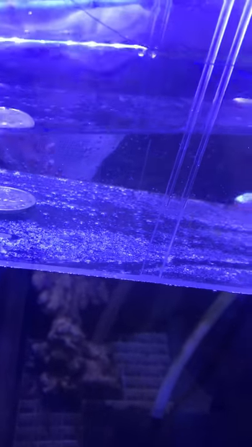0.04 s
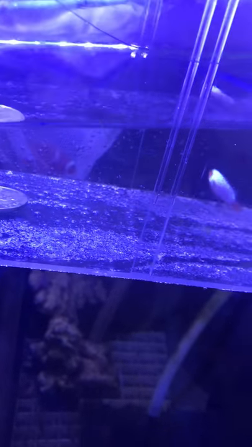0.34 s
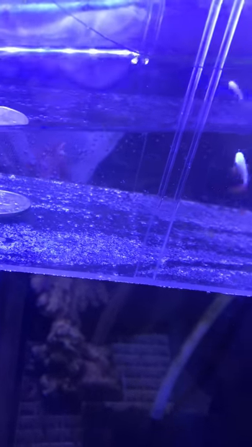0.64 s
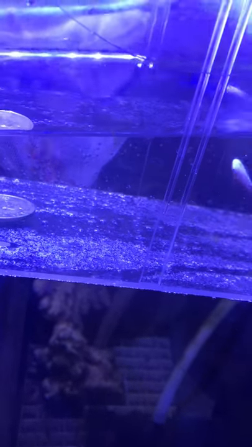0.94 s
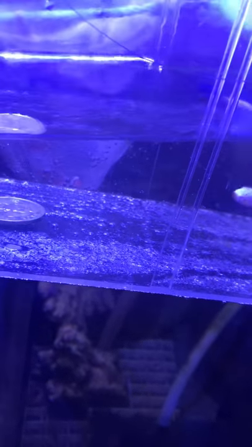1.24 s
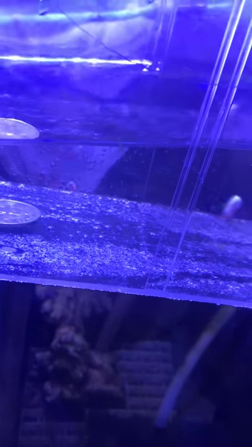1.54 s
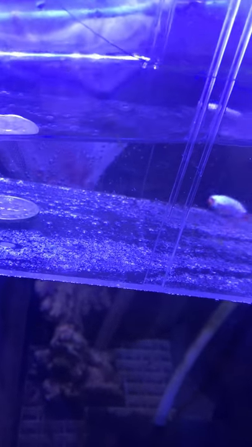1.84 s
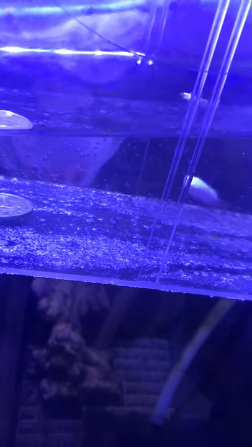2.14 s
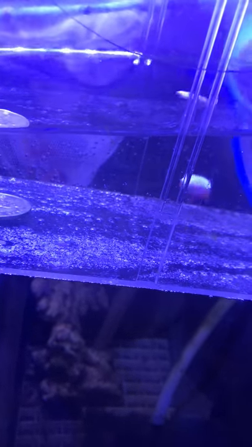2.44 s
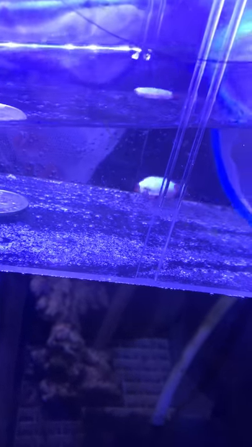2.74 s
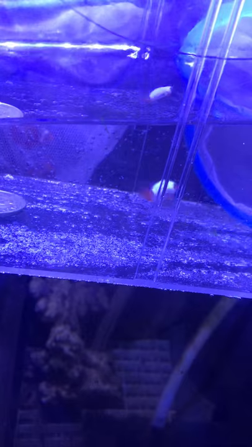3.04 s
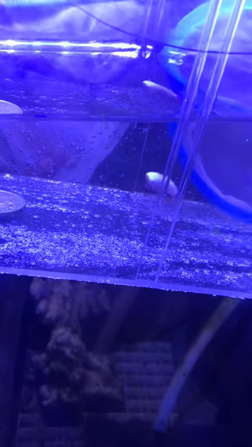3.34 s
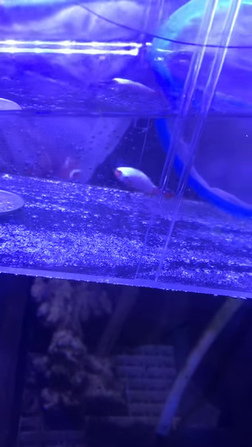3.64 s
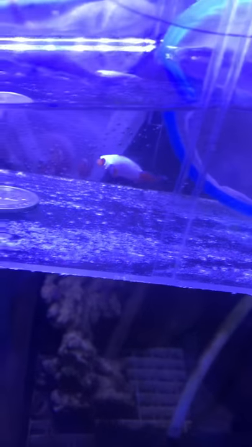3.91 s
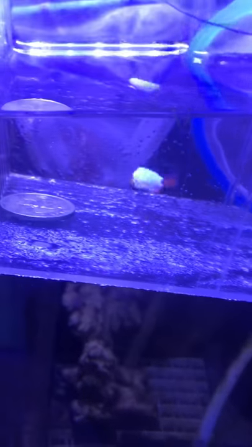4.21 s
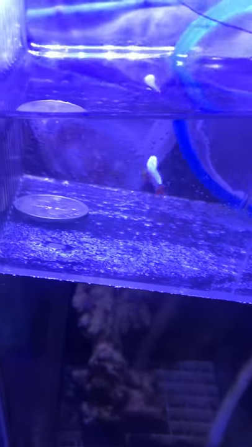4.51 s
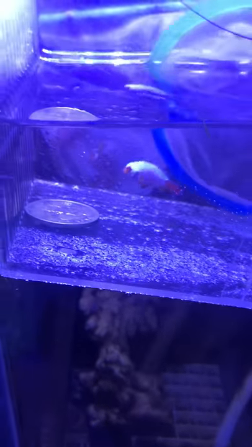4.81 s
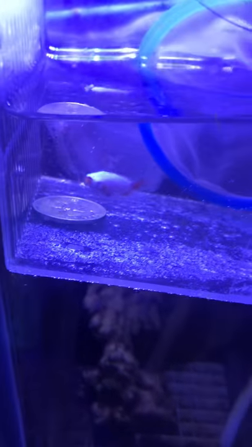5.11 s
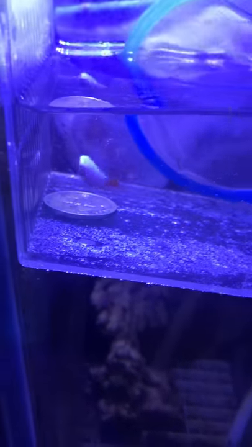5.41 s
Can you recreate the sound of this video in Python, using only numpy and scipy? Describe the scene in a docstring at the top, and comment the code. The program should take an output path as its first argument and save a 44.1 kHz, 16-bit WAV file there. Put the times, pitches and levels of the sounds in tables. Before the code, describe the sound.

Water trickles and drips continuously into a fish tank over the deep, even hum and rumble of its pump.

```python
"""Aquarium pump and trickle

A mains-driven pump hums and shakes its cabinet while the return water trickles close by.
Drops snap at the surface and trapped bubbles ring; the glass walls reflect each within milliseconds.
Behind them lie a fizz of small bubbles, the wash and gurgle of the overflow and a faint room."""
import sys
import numpy as np
from scipy import signal
from scipy.fft import rfft, irfft
from scipy.io import wavfile
from scipy.ndimage import uniform_filter1d

SR = 44100
rng = np.random.default_rng(int(sys.argv[2]) if len(sys.argv) > 2 else 0)


def master(y):
    """Save y as 16-bit WAV."""
    cut = np.clip(np.atleast_2d(y).T, -1, 1)
    pcm = np.round(cut * 32767)  # scale
    wavfile.write(sys.argv[1], SR, pcm.astype(np.int16))


N = 249606
TIME, FREQS = np.arange(N) / SR, np.fft.rfftfreq(N, 1 / SR)
EVENT_TIME = np.arange(4096) / SR


def amp(db):
    """Amplitude grows tenfold every 20 dB."""
    return 10 ** (np.asarray(db) / 20)


def unit(x):
    """Normalisation to an rms of 1."""
    return x / np.sqrt(np.mean(x ** 2) + 1e-20)


def add(mix, s, sound):
    """Superposition: a sound joins the mix at s seconds."""
    part = mix[max(round(s * SR), 0):][:len(sound)]
    part += sound[:len(part)]


def swing(curve):
    """Linear interpolation of a level curve, in dB about its mean."""
    s, db = np.transpose(curve)
    return np.interp(TIME, s, db - db.mean())


def drift(hz):
    """Low-passed noise: a random fluctuation of rms 1, up to about hz."""
    return unit(irfft(rfft(rng.standard_normal(N)) * np.exp(-(FREQS / hz) ** 2), N))


def resonances(modes, low_cut_hz=33):
    """Random excitation of resonances: their peaks add in power, with random phase."""
    peaks = (amp(db) * unit(1 / (1 + (2 * (FREQS - hz) / width) ** 2)) for hz, width, db in modes)
    magnitude = np.sqrt(sum(peak ** 2 for peak in peaks))
    low_cut = FREQS ** 4 / (FREQS ** 4 + low_cut_hz ** 4)
    phase = np.exp(2j * np.pi * rng.random(len(FREQS)))
    return irfft(magnitude * low_cut * phase, N) * np.sqrt(N)


def room(x, level_db=-14, t60=0.3, gap_s=0.01):
    """Reverberation: the diffuse field of the room decays exponentially."""
    t = TIME[:SR // 2]
    tail = rng.standard_normal(len(t)) * np.exp(-np.log(1000) * t / t60) * (t > gap_s)
    return amp(level_db) * signal.fftconvolve(x, tail / np.linalg.norm(tail))[:N]


def in_tank(x, direct_db, glass_t60=0.1, hood_db=-8, hood_t60=0.057, build_s=0.0006):
    """Early reflections off glass and hood, different for each spot on the surface."""
    paths = amp(direct_db) * signal.unit_impulse(len(EVENT_TIME))
    build_up = 1 - np.exp(-EVENT_TIME / build_s)
    for gain, t60 in ((1, glass_t60), (amp(hood_db), hood_t60)):
        echo = rng.standard_normal(len(paths)) * np.exp(-np.log(1000) * EVENT_TIME / t60) * build_up
        paths += gain * echo / np.linalg.norm(echo)
    wet = signal.fftconvolve(x, paths)[:len(paths)]
    return wet / np.linalg.norm(wet) * np.sqrt(.016 * SR)  # the energy of 16 ms at rms 1


# Cabinet modes. Each row: frequency in Hz, width in Hz, level in dB before the surges.
CABINET_MODES = [(49, 5.3, -45), (63.5, 5.8, -42)]
# Hollow modes of tank and pipes. Each row: frequency in Hz, width in Hz, level in dB.
PIPE_MODES = [(36.2, 10, -57), (84.4, 2.5, -50), (96, 19, -50), (136, 70, -50.5), (207.6, 80, -56.5),
              (351, 144, -57.5), (513, 110, -59.5)]
# Surges of the cabinet. Each row: time in seconds, relative level in dB, scaled by depth.
SURGES = [(0, -39.5), (0.7, -36.5), (1.05, -47), (1.35, -37.5), (2.55, -49.5), (3.2, -36.5), (3.85, -49),
          (4.07, -34), (4.33, -53), (4.6, -41), (5.66, -42)]


def rumble(depth=0.76):
    """Forced vibration: churning water shakes the cabinet in surges and murmurs in the pipes."""
    shake = resonances(CABINET_MODES)
    envelope = np.sqrt(abs(uniform_filter1d(unit(shake) ** 2, size=9000)) + 1e-6)
    steady_shake = shake / envelope
    return steady_shake * amp(depth * swing(SURGES)) + resonances(PIPE_MODES)


# Pump hum. Each row: multiple of the mains frequency, level in dB.
HUM_HARMONICS = [(1, -51), (2, -35), (3, -55), (4, -53.5), (5, -58.5), (6, -61), (8, -74.5), (9, -81.5),
                 (10, -70), (11, -65), (31, -73), (32, -78)]
# Faint motor whine. Each row: frequency in Hz, width in Hz, level in dB.
WHINE_BANDS = [(315, 6.9, -65), (671.4, 12, -69), (1845, 72, -69), (2950, 27, -72), (3850, 43, -72.5)]


def pump(mains_hz=50.02, waver_db=0.17, waver_hz=5, jitter_cycles=0.0038):
    """A harmonic series on the mains frequency, wavering with the load on the impeller."""
    cycles = mains_hz * TIME + jitter_cycles * drift(0.57)
    hum = sum(amp(db) * np.sqrt(2) * np.cos(2 * np.pi * (k * cycles + rng.random()))
              for k, db in HUM_HARMONICS)
    return hum * amp(waver_db * drift(waver_hz)) + resonances(WHINE_BANDS)


# Strength of the trickle. Each row: time in seconds, relative level in dB, scaled by depth.
FLOW_CURVE = [(0.0, -51.5), (0.33, -52.5), (0.72, -51.5), (1.29, -50), (1.7, -52.5), (2.05, -50),
              (2.73, -53.5), (2.98, -50.5), (3.81, -51.5), (4.13, -50), (4.96, -51.5), (5.14, -49.5),
              (5.66, -49.5)]


def flow_gain(depth=0.81, flutter_db=1.16, flutter_hz=14):
    """Amplitude modulation: the falling water swells slowly and flutters."""
    return amp(depth * swing(FLOW_CURVE) + flutter_db * drift(flutter_hz))


# Spectrum of running water. Each row: frequency in Hz, relative gain in dB.
WATER_SPECTRUM = [(150, 4), (400, -5.5), (1000, 0), (1300, -4.5), (2200, -6), (4100, -10.5), (4900, -14),
                  (6500, -12.5), (7700, -19.5), (8400, -16.5), (9600, -16), (10400, -24), (11200, -20),
                  (13200, -18.5), (16000, -21)]


def water_colour(x):
    """Spectral shaping gives a signal the timbre of running water, at rms 1."""
    hz, db = np.transpose(WATER_SPECTRUM)
    gain = amp(np.interp(np.log(FREQS + 1), np.log(hz), db))
    low_cut = np.minimum(FREQS / hz[0], 1) ** 2
    return unit(irfft(rfft(x) * gain * low_cut, N))


def wash(flow, level_db=-55.0):
    """Broadband flow noise: water rushes over the overflow."""
    return amp(level_db) * flow * water_colour(rng.standard_normal(N))


def bubble(hz, decay_cycles, rise, onset_cycles=0.82):
    """A damped oscillator: trapped air rings, its pitch climbing as it nears the surface."""
    age = hz * EVENT_TIME / decay_cycles
    pitch = hz * (1 + rise * np.tanh(age - .5))
    pinch_off = 1 - np.exp(-hz * EVENT_TIME / onset_cycles)
    return np.sin(2 * np.pi * np.cumsum(pitch) / SR) * pinch_off * np.exp(-age)


# Air gulped by the overflow. Each row: pitch in Hz, rms level in dB, mean gulps per second.
AIR_GULPS = [(389, -60, 14), (535, -64, 30), (690, -63, 24)]


def gurgle(pitch_spread=0.037, spread_db=1.5):
    """Large air volumes resonate low: the overflow swallows bubbles at uneven moments."""
    out = np.zeros(N)
    for hz, db, per_s in AIR_GULPS:
        gulps = np.zeros(N)
        gaps, detunes, strengths = rng.standard_normal((300, 3)).T
        starts = np.cumsum(abs(gaps) * np.sqrt(np.pi / 2)) / per_s
        for s, detune, strength in zip(starts[starts < N / SR], detunes, strengths):
            ring = bubble(hz * np.exp(pitch_spread * detune), decay_cycles=2.94, rise=0.046)
            add(gulps, s, amp(spread_db * strength) * ring)
        out += amp(db) * unit(gulps)
    return out


def fizz(flow, level_db=-54.0, bubbles_per_s=560, ticks_per_s=190, tick_db=-2, spread_db=2.5):
    """Incoherent summation: small bubbles of many sizes merge with the ticks of fine spray."""
    def scatter(sound, per_s):
        """Convolution with random impulses, mostly weak, repeats a sound in the tank."""
        strikes = np.zeros(N)
        when, chance = rng.random((200, 2))[:int(per_s * N / SR) + 1].T
        strikes[(when * N).astype(int)] = amp(spread_db * np.minimum(-np.log(chance + 1e-9), 3))
        return signal.oaconvolve(strikes, in_tank(sound, direct_db=-12))[:N]
    pitches, treble_tilt, spray_spots = np.geomspace(600, 15000, 90), 0.56, 20
    per_pitch = bubbles_per_s / len(pitches)
    rings = sum(hz ** treble_tilt * scatter(bubble(hz, decay_cycles=6, rise=0.022), per_pitch)
                for hz in pitches)
    ticks = sum(scatter(np.ones(1), ticks_per_s / spray_spots) for _ in range(spray_spots))
    return amp(level_db) * flow * water_colour(unit(rings) + amp(tick_db) * unit(ticks))


def snap(centre_hz, octaves, decay_s=0.00054):
    """Impact noise: a drop bursts the surface, higher in pitch the smaller the drop."""
    burst = rng.standard_normal(len(EVENT_TIME)) * np.exp(-EVENT_TIME / decay_s)
    edges = np.minimum(centre_hz * 2 ** (octaves * np.array([-.5, .5])), SR / 2 - 1)
    return signal.sosfilt(signal.butter(2, edges, "band", fs=SR, output="sos"), burst)


def plink(hz, snap_db=-9):
    """Air entrainment: a drop snaps, and the bubble it drags under rings."""
    ring = unit(bubble(hz, decay_cycles=5.6, rise=0.0026))
    impact = amp(snap_db) * unit(snap(1.15 * hz, octaves=3.2))
    return in_tank(ring + impact, direct_db=-9)


def dripping(per_s, level_db, low_hz, high_hz, db_per_octave, spread_db, count=120):
    """Jittered periodicity: one drip per beat, as start in seconds, level in dB, pitch in Hz."""
    when, height, strength = rng.random((count, 3)).T
    octaves = height * np.log2(high_hz / low_hz)
    db = level_db + db_per_octave * octaves + spread_db * (2 * strength - 1)
    return zip((np.arange(count) + when) / per_s, db, low_hz * 2 ** octaves)


def patter():
    """Lesser impacts: middling bubbles ring and fine droplets snap among the large ones."""
    out = np.zeros(N)
    for s, db, hz in dripping(12, -53.5, low_hz=1003, high_hz=5560, db_per_octave=-0.5, spread_db=1):
        add(out, s, amp(db) * plink(hz))
    for s, db, hz in dripping(4, -55, low_hz=6100, high_hz=11900, db_per_octave=-1, spread_db=2):
        add(out, s, amp(db) * in_tank(snap(hz, octaves=1), direct_db=-11))
    return out


# Large drops. Each row: start in seconds, level in dB before gain_db, centre in Hz, width in octaves.
LARGE_DROPS = [(0.3446, -49, 9000, 1.5), (0.389, -43.5, 4200, 1), (0.4264, -49.5, 8150, 0.74),
               (0.6304, -48, 8000, 2), (0.788, -44.5, 4740, 2.6), (1.0515, -43.5, 1550, 1.3),
               (1.1456, -43.5, 10900, 0.72), (1.1737, -44, 1800, 0.87), (1.284, -45, 1700, 2.2),
               (1.361, -41.5, 10000, 2.6), (1.4123, -44.5, 1450, 2.4), (1.5736, -39, 2020, 2),
               (2.0091, -48.5, 10000, 1.5), (2.038, -45.5, 13000, 0.44), (2.1395, -46.5, 4700, 2.1),
               (2.6383, -43.5, 2560, 1.6), (2.7071, -48.5, 8000, 2.2), (3.488, -39.5, 8350, 0.95),
               (3.5064, -38.5, 3250, 1.1), (4.0404, -44, 6250, 3.5), (4.136, -46, 3080, 1.1),
               (4.3666, -39.5, 6300, 4.6), (4.5786, -48, 11000, 0.7), (4.7227, -51, 4900, 3.1),
               (4.966, -48.5, 7150, 0.9), (5.3274, -47.5, 10900, 0.9), (5.375, -45.5, 6650, 0.81),
               (5.5385, -47, 9450, 1.2)]


def splashes(gain_db=-3.9):
    """Impact transients: large drops strike the surface and the tank reflects each snap."""
    out = np.zeros(N)
    for s, db, centre_hz, octaves in LARGE_DROPS:
        add(out, s, amp(db + gain_db) * in_tank(snap(centre_hz, octaves), direct_db=-11))
    return out


# The loudest bubbles. Each row: start in seconds, level in dB before gain_db, pitch in Hz.
NEAR_BUBBLES = [(0.2005, -50.5, 2490), (0.336, -47, 382), (0.3926, -51.5, 3750), (0.446, -52.5, 3070),
                (0.5392, -52.5, 2730), (0.633, -48, 4500), (0.786, -45.5, 2900), (0.893, -49.5, 1630),
                (0.964, -47.5, 707), (1.0524, -45, 2230), (1.196, -51, 1980), (1.2828, -50.5, 1410),
                (1.3896, -47, 2400), (1.411, -44.5, 704), (1.574, -46, 1500), (1.9522, -47.5, 2970),
                (2.1092, -48.5, 7240), (2.137, -47, 1910), (2.4257, -48, 1930), (2.472, -49.5, 3950),
                (2.7077, -50, 4320), (2.846, -48, 400), (3.142, -46.6, 372), (3.339, -51.5, 5230),
                (3.51, -48.5, 3690), (3.529, -45.5, 3600), (3.7365, -51.5, 2350), (3.803, -52, 393),
                (3.8254, -52, 4540), (3.863, -51, 9252), (3.928, -51, 2850), (3.9688, -50, 3400),
                (3.996, -45, 706), (4.022, -48, 1480), (4.042, -49.5, 3520), (4.1368, -48, 1830),
                (4.1904, -51, 1480), (4.576, -42, 1835), (4.6375, -46, 3930), (4.7267, -45, 2000),
                (4.9802, -51.5, 1950), (5.021, -51.5, 1190), (5.252, -48, 540), (5.512, -48.5, 6750),
                (5.5658, -47, 3380)]


def near_bubbles(gain_db=-0.1):
    """Bubble resonance: each nearby pocket of air rings at its own natural frequency."""
    out = np.zeros(N)
    for s, db, hz in NEAR_BUBBLES:
        add(out, s, amp(db + gain_db) * plink(hz))
    return out


def scene():
    """Superposition of pump and water in one channel; only drops and bubbles reverberate."""
    flow = flow_gain()
    trickle = near_bubbles() + splashes() + patter() + fizz(flow) + gurgle()
    return (pump() + rumble() + wash(flow) + trickle + room(trickle))[None]


def record(dry, cutoff_hz=15850):
    """Band limiting: a steep low-pass filter removes the highest treble."""
    low_pass = signal.firwin(1023, cutoff_hz, window=("kaiser", 9), fs=SR)
    return signal.oaconvolve(dry, low_pass[None], "same")


dry = scene()
out = record(dry)
master(out)
```